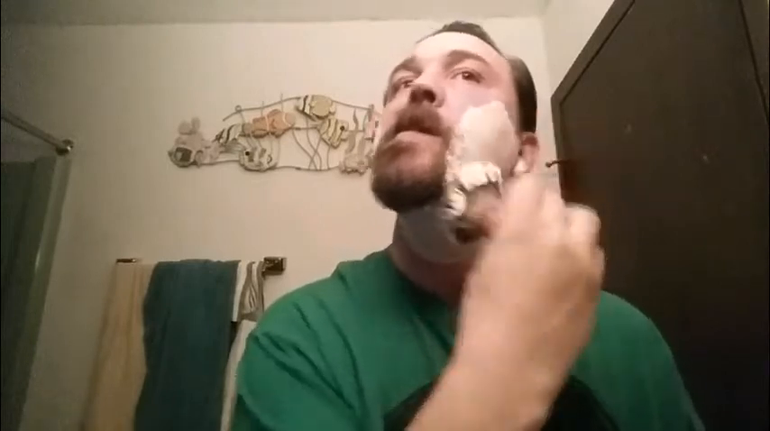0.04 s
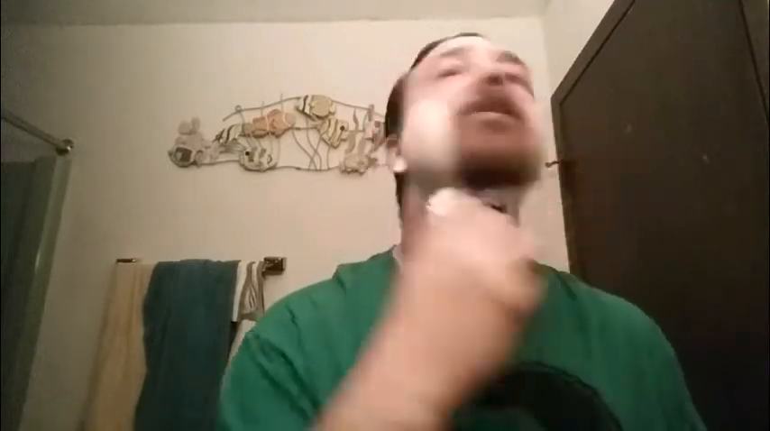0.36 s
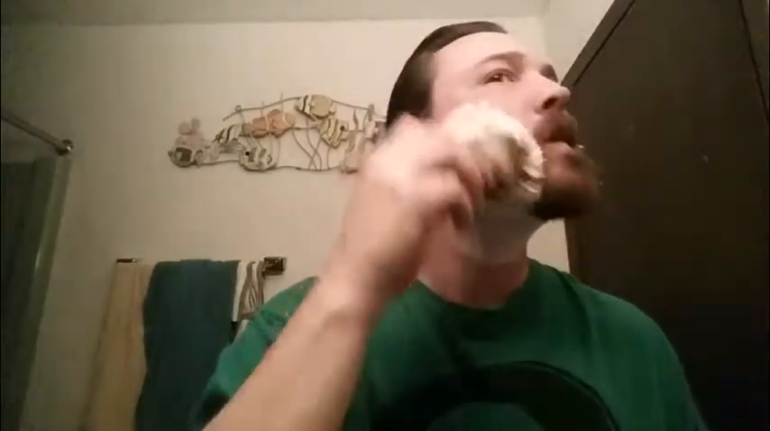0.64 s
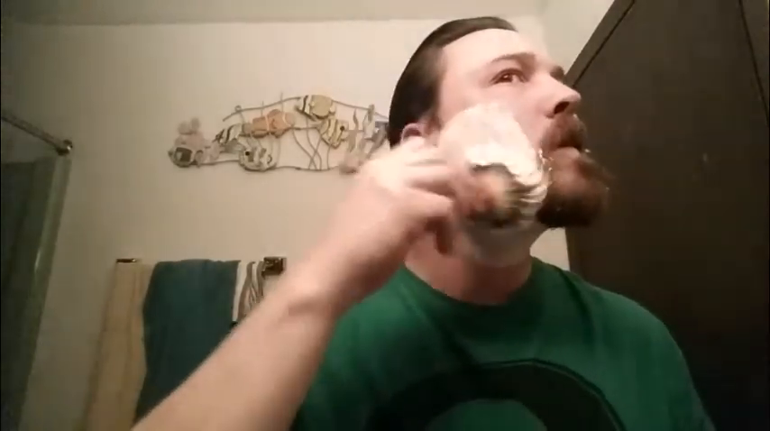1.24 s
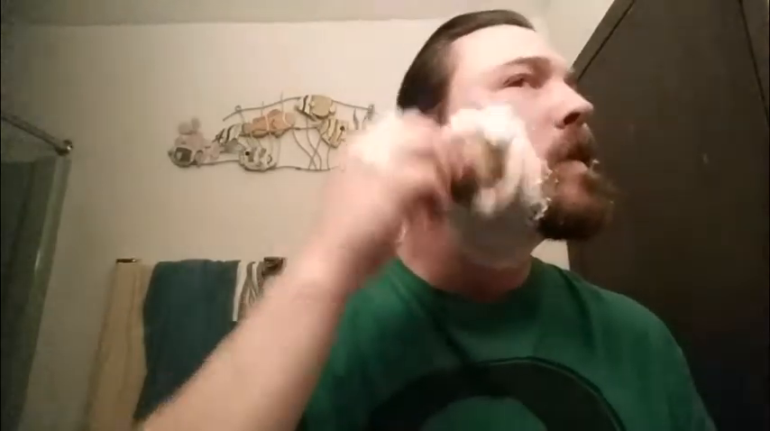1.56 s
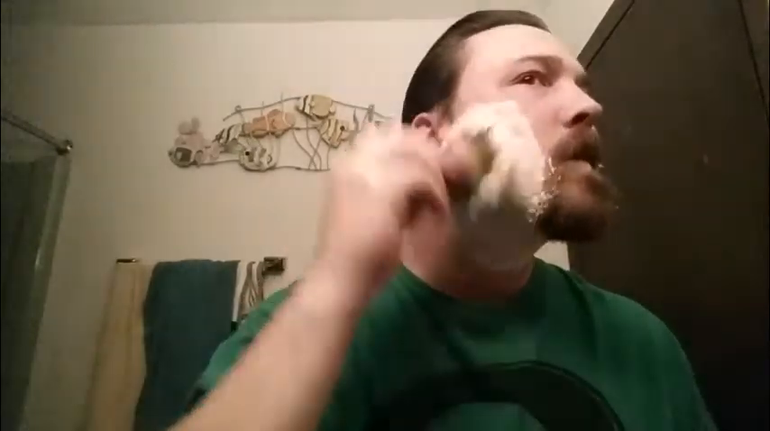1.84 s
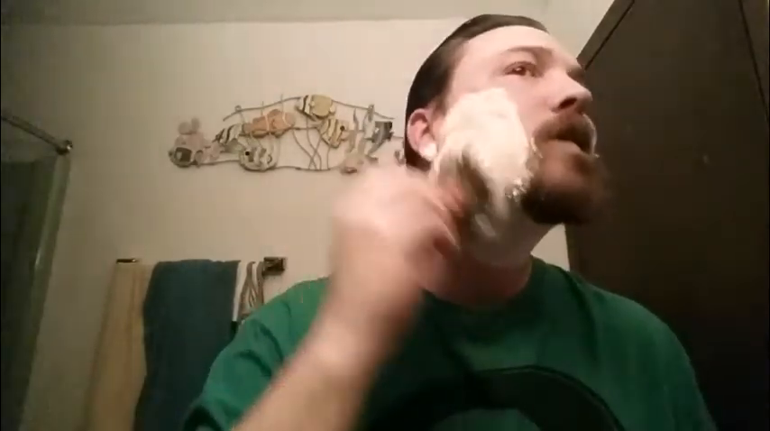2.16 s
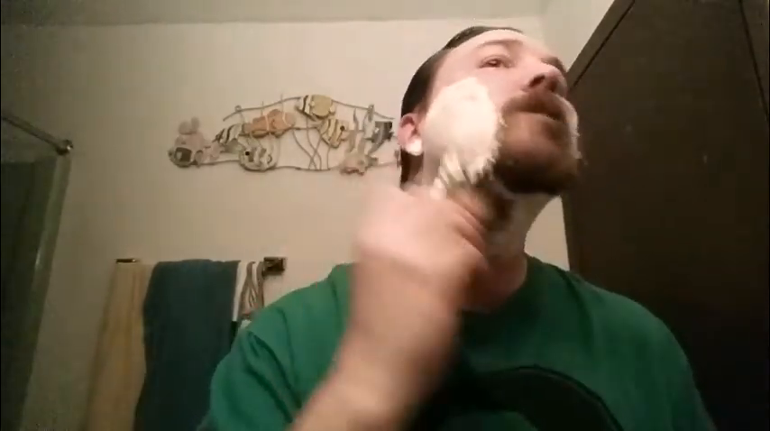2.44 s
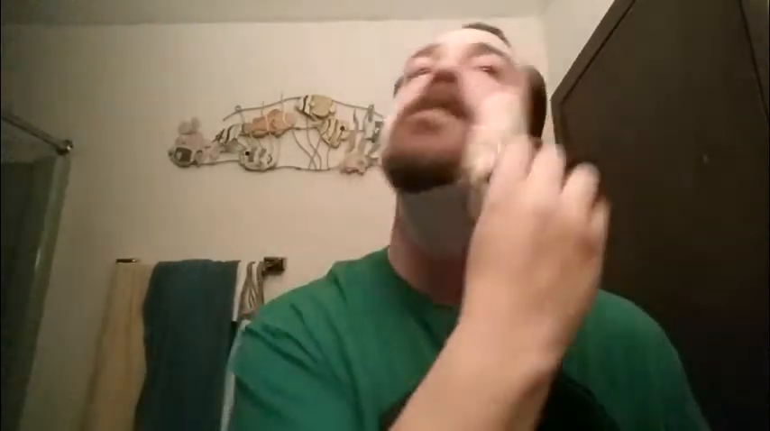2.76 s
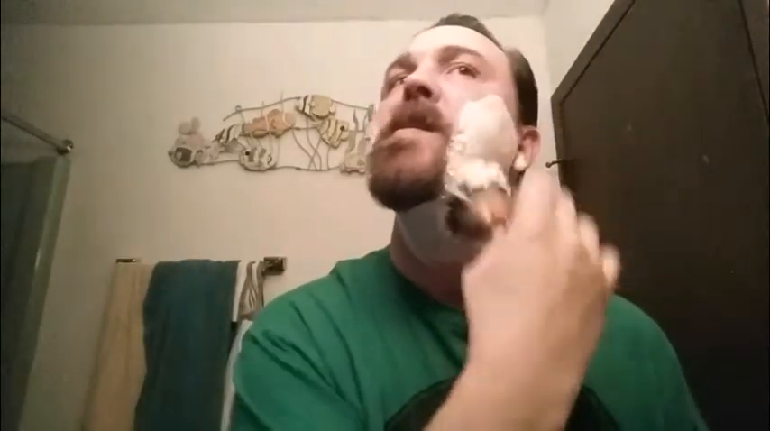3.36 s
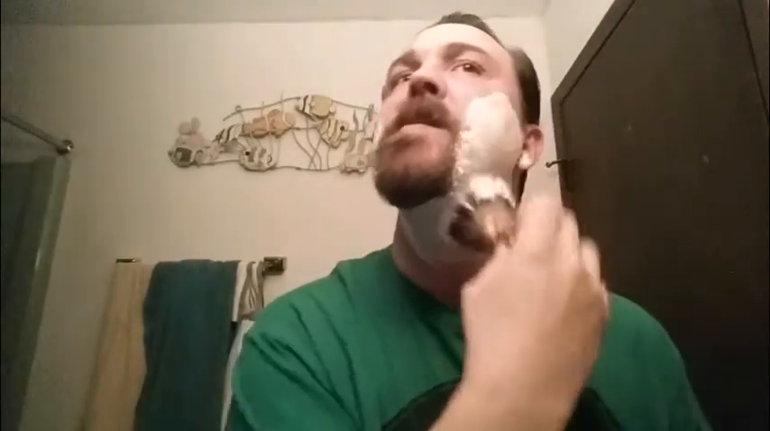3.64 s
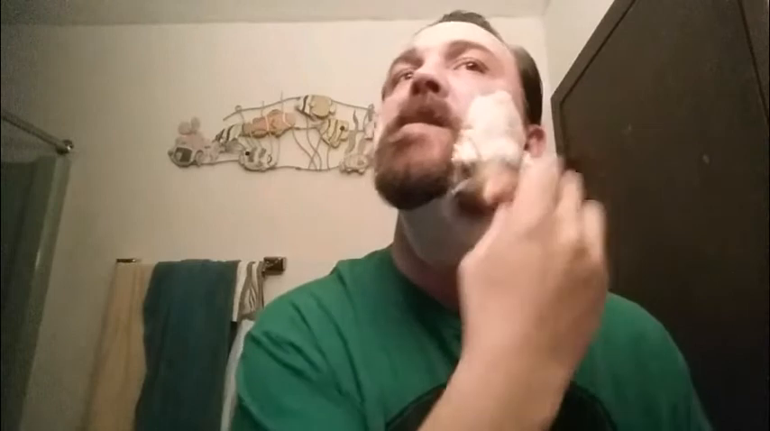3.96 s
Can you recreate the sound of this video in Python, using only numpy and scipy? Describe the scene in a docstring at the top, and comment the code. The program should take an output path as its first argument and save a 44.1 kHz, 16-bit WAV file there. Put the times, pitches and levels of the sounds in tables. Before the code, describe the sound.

A lathered shaving brush swishes over a stubbly cheek, foam fizzing, while a bathroom fan hums.

```python
"""Wet bristles swish over a stubbly cheek: a lathered shaving brush, close by in a small bathroom.
Foam bubbles burst with each stroke and add a fizz; behind it a ventilation fan hums and rumbles throughout.
Now and then the brush lands with a soft squelch of squeezed air; late on, three large bubbles pop.
The near walls add a short tail, and the microphone's two small ports colour the treble differently."""
import sys
import numpy as np
from scipy import signal
from scipy.fft import rfft, irfft
from scipy.io import wavfile

SR = 44100
rng = np.random.default_rng(int(sys.argv[2]) if len(sys.argv) > 2 else 0)


def wav_record(signal):
    """Record a signal, one row per channel, as 16-bit PCM in the file named by sys.argv[1]."""
    frames = np.transpose(np.atleast_2d(signal))
    bounded = np.clip(frames, -1, 1)
    # unit amplitude maps onto the largest positive 16-bit level
    quanta = np.round(bounded * 32767).astype(np.int16)
    wavfile.write(sys.argv[1], SR, quanta)


N = 176400
T = np.arange(N) / SR
HZ = np.fft.rfftfreq(N, 1 / SR)

# brush strokes on the cheek: t/s of greatest speed, length/s, level/dB, fizz offset/dB
BRUSH_STROKES = [(.02, 0.4, -11, 5.5), (0.218, 0.059, -8.5, 5.5), (0.365, 0.19, -1.5, -4.5),
                 (0.538, 0.12, -0.5, 1), (0.667, 0.12, -0.5, 0.5), (0.83, 0.2, 1.5, -8),
                 (0.93, 0.08, -0.5, 0.5), (1.045, 0.23, 0.5, -9), (1.188, 0.091, 1, 2.5),
                 (1.26, 0.084, -4.5, -13), (1.384, 0.15, 0, -11), (1.625, 0.1, -0.5, -0.5),
                 (1.756, 0.085, -0.4, 3), (1.93, 0.13, 1.6, 0), (2.06, 0.079, 0, -3),
                 (2.204, 0.1, 4.5, -0.5), (2.31, 0.085, -0.4, -6), (2.469, 0.1, 0.5, -3),
                 (2.612, 0.32, -9.5, -7), (2.791, 0.1, -3.5, 2.5), (2.849, 0.068, -2, 4.5),
                 (2.98, 0.062, -11, 7.5), (3.157, 0.087, -2.5, -4.5), (3.228, 0.046, -4.5, 2.5),
                 (3.282, 0.12, -7, 4), (3.454, 0.083, -2.5, 3), (3.566, 0.098, -6, 5),
                 (3.735, 0.15, -3.5, 2), (3.845, 0.1, -7, 5.5), (3.99, 0.13, -1.5, 1)]
# spectrum of bristles on stubble: f/Hz, level/dB
SWISH_SPECTRUM = [(200, -21), (500, -11), (900, -3), (1500, 0.5), (2300, -2.5), (3200, -2.5), (4500, -12.5),
                  (7000, -20), (14000, -10)]
# spectrum of bursting foam: f/Hz, level/dB
FIZZ_SPECTRUM = [(800, -26), (2500, 1), (4000, 1), (6000, 0), (9000, -2), (12500, -3), (15000, -2.5)]
# motor and duct tones: f/Hz, level/dB, pitch waver/Hz
FAN_TONES = [(75.16, -50, 0.98), (120.35, -41, 0.29), (208.6, -60.5, 1.12), (263.2, -53.5, 0.93),
             (321.2, -53.5, 1.48), (402.3, -59, 1.8)]
# spectrum of the fan's rush of air: f/Hz, level/dB
AIR_SPECTRUM = [(100, 20), (700, -9), (1000, -5), (1500, 5.5), (2500, -0.5), (4000, -5), (6000, -26),
                (9000, -30), (14000, -4)]
# spectrum of the room's low noise: f/Hz, level/dB
RUMBLE_SPECTRUM = [(28, -24), (46, -16), (60, 0), (92, 3), (125, -3.5), (210, -2), (280, -9), (308, -1.5),
                   (360, -9), (410, -9.5), (520, -17.5), (640, -25.5), (1000, -31.5), (3000, -54)]
# brief swells of the rumble: t/s, length/s, f/Hz, level/dB
RUMBLE_SWELLS = [(.07, .22, 78, -43), (0.634, 0.19, 360, -45.5), (0.827, .26, 75, -43),
                 (3.127, 0.16, 175, -43), (3.795, 0.28, 221, -43.5), (3.884, 0.21, 76, -44.5)]
# the loaded brush lands on the skin: t/s, level/dB
BRUSH_LANDINGS = [(.578, 1.5), (1.62, -2.5), (2.21, -6), (2.45, -8), (3.42, 0), (3.695, -7)]
# spectrum of squeezed lather: f/Hz, level/dB
SQUELCH_SPECTRUM = [(150, 21), (450, -11), (800, 10.5), (1200, -29), (2500, -31), (6000, -31)]
# large bubbles bursting under the brush: t/s, f/Hz, level/dB
BUBBLE_POPS = [(3.413, 1200, -51), (3.427, 870, -48.5), (3.711, 2400, -49)]
# likeness of the sound at the two microphone ports: f/Hz, coherence
PORT_COHERENCE = [(60, 0.6), (300, 0.9), (450, 0.88), (650, -0.12), (1000, 0.42), (2000, -0.17),
                  (4000, -0.058)]
# response of the ports: f/Hz, left level/dB, right level/dB
PORT_RESPONSE = [(443, 0, 0.5), (605, -3, 3.5), (750, 2, -1), (1420, -1.5, 0), (2630, 3, -3),
                 (3250, -6, -3.5), (3520, -4.5, -3), (4660, -8, -3.5), (5100, -6, 4.5), (5350, -7, 5.5),
                 (5320, -14, -1), (6100, -28, -3.5), (6770, -3.5, -2.5), (7400, -7.5, -14.5),
                 (7950, -9.5, 0), (8800, 4, -5), (10760, -1, 1.5), (11600, -2.5, -3), (12430, 0, 1.5),
                 (15000, -14, -18)]

SWISH_DB, FIZZ_DB, AIR_DB, RUMBLE_DB, SQUELCH_DB = -53, -54, -55, -41.5, -41
SPEED_UP, SLOW_DOWN = 0.5, 0.39  # shares of a stroke's length before and after its peak
STROKE_EDGE = 1.97  # 2 is a rounded stroke; higher starts and stops more abruptly


def amp(db):
    """Decibels to gain."""
    return 10 ** (np.asarray(db) / 20)


def unit(x):
    """Scales to rms 1."""
    return x / np.sqrt(np.mean(x ** 2) + 1e-20)


def curve(table, column=1):
    """One column of a table at every frequency, joined on a log axis."""
    columns = np.transpose(table)
    return np.interp(np.log(HZ + 1), np.log(columns[0] + 1), columns[column])


def noise():
    """Two unrelated white noises."""
    return rng.standard_normal((2, N))


def drift(rate_hz):
    """A random wander of rms 1, with changes up to about the given rate."""
    return unit(irfft(rfft(rng.standard_normal(N)) * np.exp(-(HZ / rate_hz) ** 2), N))


def tone(hz, waver_hz, rate_hz):
    """A sine of rms 1 whose pitch wanders."""
    cycles = rng.random() + np.cumsum(hz + waver_hz * drift(rate_hz)) / SR
    return unit(np.sin(2 * np.pi * cycles))


def colour(pair, spectrum):
    """Gives two unrelated signals a spectrum and the likeness that the two ports hear."""
    left, other = rfft(pair)
    coherence = np.clip(curve(PORT_COHERENCE), -1, 1)
    right = coherence * left + np.sqrt(1 - coherence ** 2) * other
    return unit(irfft(np.array([left, right]) * amp(curve(spectrum)), N))


def crackle(per_s, spread_db, snap_share):
    """Tiny snaps of uneven size, heard at both ports, in a wash of countless smaller ones."""
    sizes = amp(spread_db * np.minimum(rng.exponential(1, N), 5))
    hits = rng.random(N) < per_s / SR
    snaps = unit(sizes * hits * rng.choice([-1, 1], (2, N)))
    return np.sqrt(snap_share) * snaps + np.sqrt(1 - snap_share) * noise()


def brush(rest_db=-10, grip_db=1.03):
    """Each stroke speeds up and slows down; bristles flick over stubble and foam bursts with the motion."""
    rub_power = foam_power = amp(rest_db) ** 2
    for peak, length, level_db, fizz_db in BRUSH_STROKES:
        ramp_s = length * np.where(T < peak, SPEED_UP, SLOW_DOWN)
        speed = np.exp(-np.minimum(abs(T - peak) / ramp_s, 4) ** STROKE_EDGE)
        rub_power = rub_power + speed * amp(level_db) ** 2
        foam_power = foam_power + speed * amp(level_db + fizz_db) ** 2
    bristles = colour(crackle(per_s=2500, spread_db=2.5, snap_share=0.38), SWISH_SPECTRUM)
    swish = amp(SWISH_DB) * np.sqrt(rub_power) * lather(bristles)
    bubbles = colour(crackle(per_s=2200, spread_db=3, snap_share=0.33), FIZZ_SPECTRUM)
    fizz = amp(FIZZ_DB) * np.sqrt(foam_power) * bubbles
    return (swish + fizz) * amp(grip_db * drift(rate_hz=53))


def lather(swish, bands=16, span_hz=(788, 4630), depth_db=2.5):
    """Pockets in the lather open and close: narrow bands of the swish come and go on their own."""
    band_index = np.interp(np.log(HZ + 1), np.log(span_hz), [0, bands - 1])
    spectrum, out = rfft(swish), np.zeros((2, N))
    for k in range(bands):
        band = irfft(spectrum * np.maximum(1 - abs(band_index - k), 0), N)
        out += band * amp(depth_db * drift(rate_hz=22))
    return unit(out)


def fan(flutter_db=2.5, lag_s=0.00015):
    """Wavering motor and duct tones over the rumble, reaching the left port first; a thin rush of air."""
    hum = sum(amp(db + flutter_db * drift(rate_hz=30)) * tone(hz, waver_hz, rate_hz=5.17)
              for hz, db, waver_hz in FAN_TONES)
    port_delay = np.exp(-2j * np.pi * HZ * np.array([[0], [lag_s]]))
    drone = irfft(rfft(hum + rumble()) * port_delay, N)
    return drone + amp(AIR_DB) * colour(noise(), AIR_SPECTRUM)


def rumble(waver_share=0.0446):
    """Low room tone, which now and then swells at one pitch."""
    low = amp(RUMBLE_DB) * colour(noise(), RUMBLE_SPECTRUM)
    for peak, length, hz, db in RUMBLE_SWELLS:
        swell = np.exp(-((T - peak) / (length / 2)) ** 2)
        low += amp(db) * swell * tone(hz, hz * waver_share, rate_hz=40)
    return low


def squelches(rise_s=0.013, fall_s=0.016):
    """The landing brush squeezes larger air pockets out of the lather."""
    pressure = np.zeros(N)
    for start, db in BRUSH_LANDINGS:
        rise = np.clip((T - start) / rise_s, 0, 1)
        fall = np.exp(-np.maximum(T - start - rise_s, 0) / fall_s)
        pressure += amp(db) * rise * fall
    pockets = colour(crackle(per_s=500, spread_db=-0.5, snap_share=0.54), SQUELCH_SPECTRUM)
    return amp(SQUELCH_DB) * pressure * pockets


def pops(fall_s=0.004, bandwidth_share=0.53):
    """Single large bubbles burst: a snap that rings very briefly at the pitch of its pocket."""
    out = np.zeros((2, N))
    for start, hz, db in BUBBLE_POPS:
        burst = noise() * (T > start) * np.exp(-abs(T - start) / fall_s)
        radius = np.exp(-np.pi * hz * bandwidth_share / SR)
        resonance = [1, -2 * radius * np.cos(2 * np.pi * hz / SR), radius ** 2]
        ring = signal.lfilter([1, 0, -1], resonance, burst + 1e-18)
        out += amp(db) * unit(ring) * np.sqrt(fall_s * SR / N)  # level taken over one fall time
    return out


def bathroom(direct, patterns=4, t60_s=0.18, tail_db=-6.5, crossfades_per_s=3.972):
    """A short, dense tail from the close walls; several patterns crossfade so it is smooth, not ringing."""
    t, reflections = T[:SR // 2], np.zeros((2, N))
    for k in range(patterns):
        tail = rng.standard_normal((2, len(t))) * (t > .003) * amp(-60 * t / t60_s)  # begins after 3 ms
        tail /= np.linalg.norm(tail, axis=1, keepdims=True)
        crossfade = np.sqrt(2 / patterns) * np.cos(np.pi * (crossfades_per_s * T + k / patterns))
        reflections += signal.fftconvolve(direct * crossfade, tail, axes=1)[:, :N]
    return direct + amp(tail_db) * reflections


def scene():
    """The brush close by in the bathroom, the fan behind it."""
    return bathroom(brush() + squelches() + pops()) + fan()


def record(dry, edge_hz=14500):
    """The microphone: each port's colour, then the band limit."""
    ports = amp([curve(PORT_RESPONSE, column=1), curve(PORT_RESPONSE, column=2)])
    heard = irfft(rfft(dry) * ports, N)
    lowpass = signal.firwin(511, edge_hz, window=("kaiser", 9), fs=SR)
    return signal.oaconvolve(heard, lowpass[None], "same")


dry = scene()
out = record(dry)
wav_record(out)
```